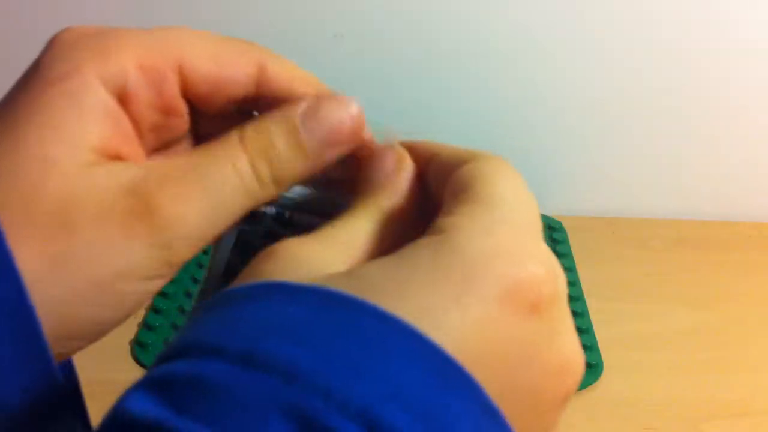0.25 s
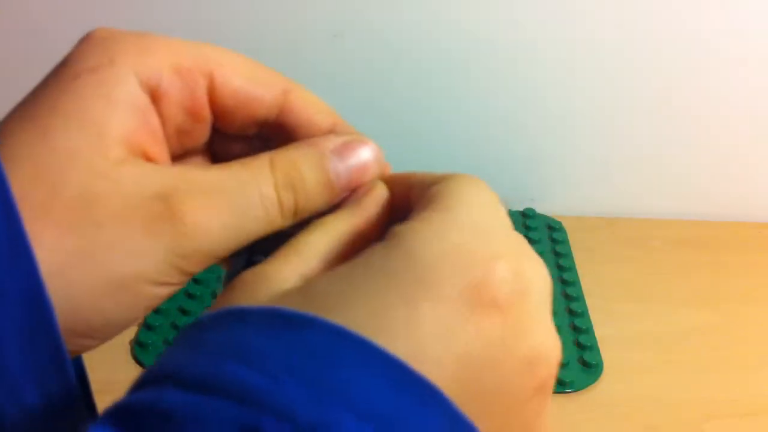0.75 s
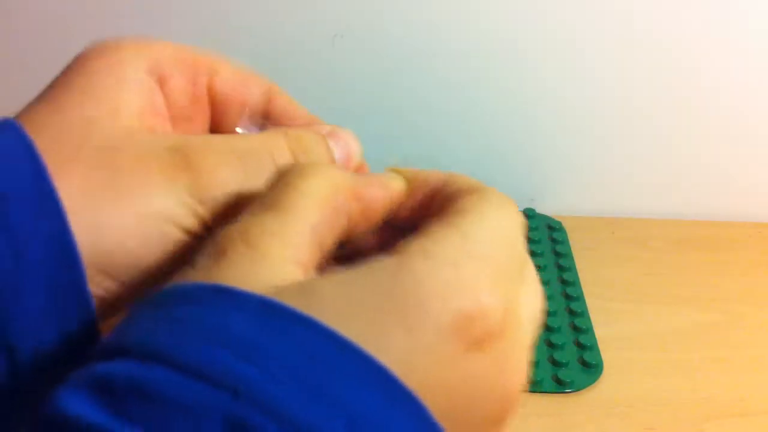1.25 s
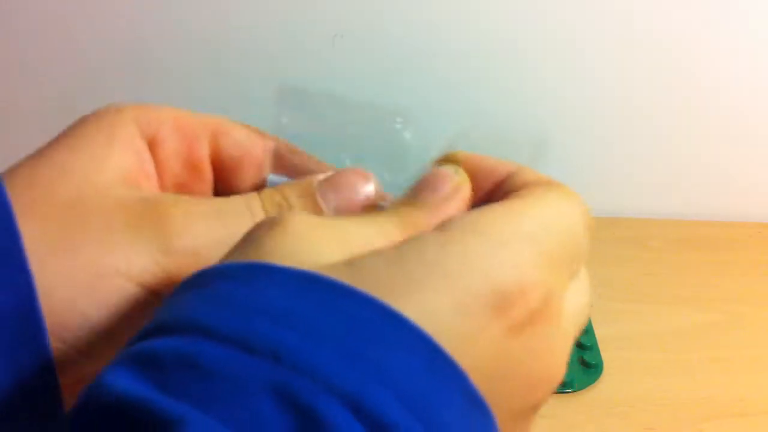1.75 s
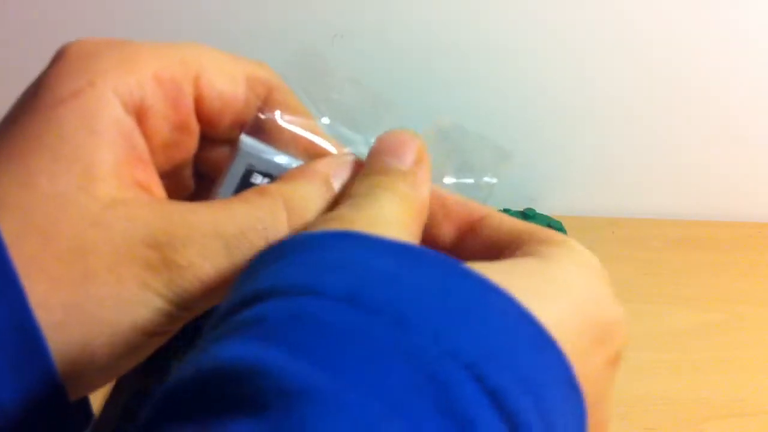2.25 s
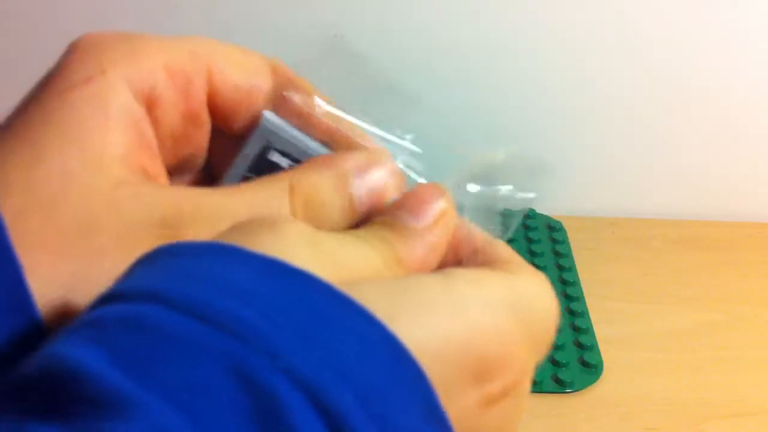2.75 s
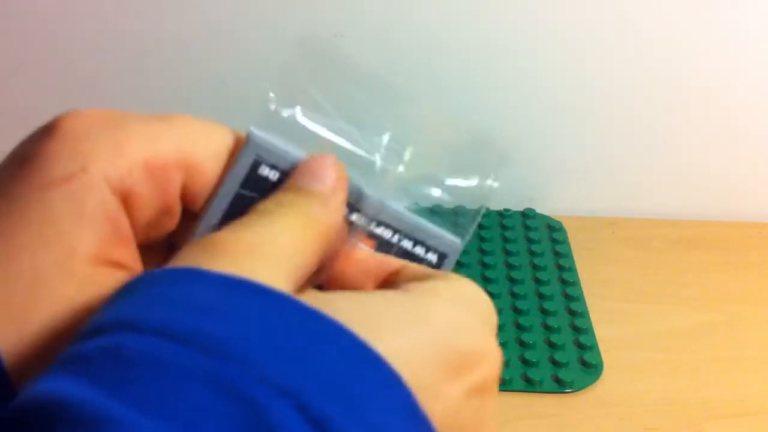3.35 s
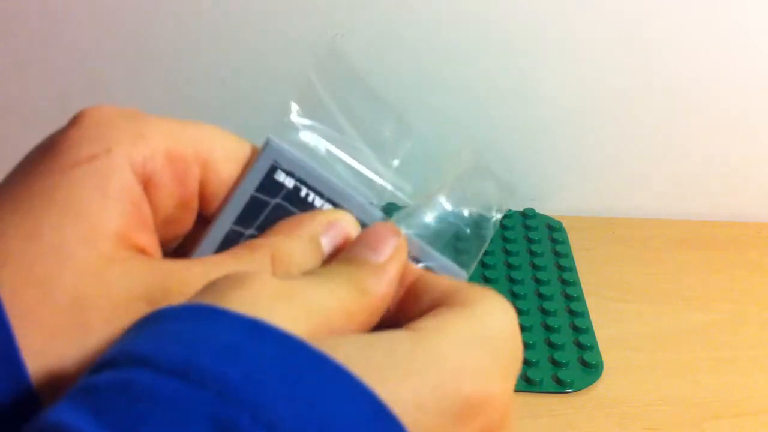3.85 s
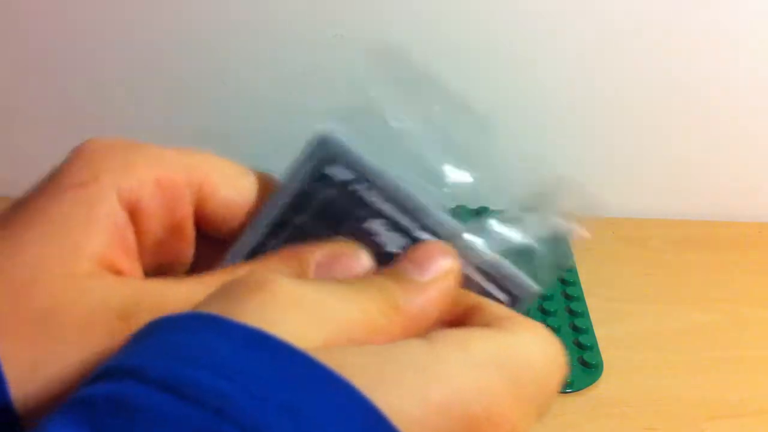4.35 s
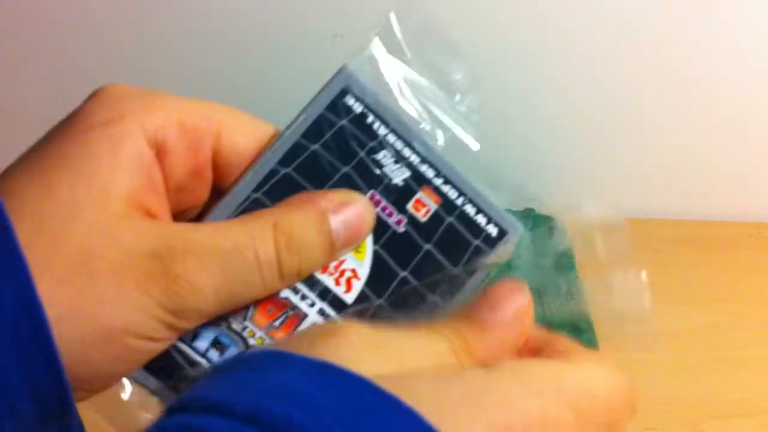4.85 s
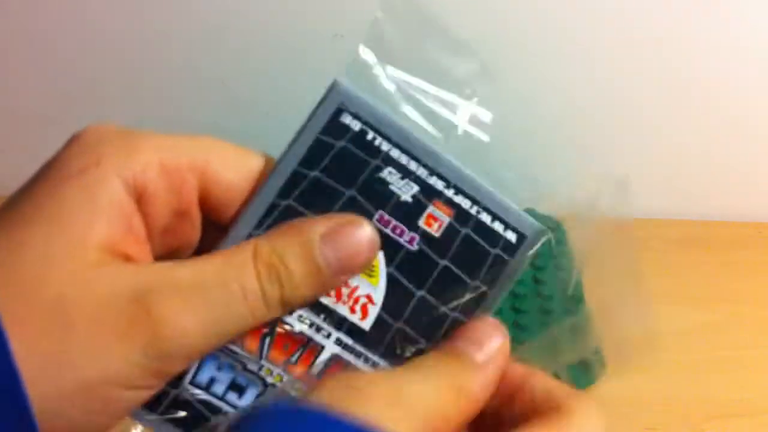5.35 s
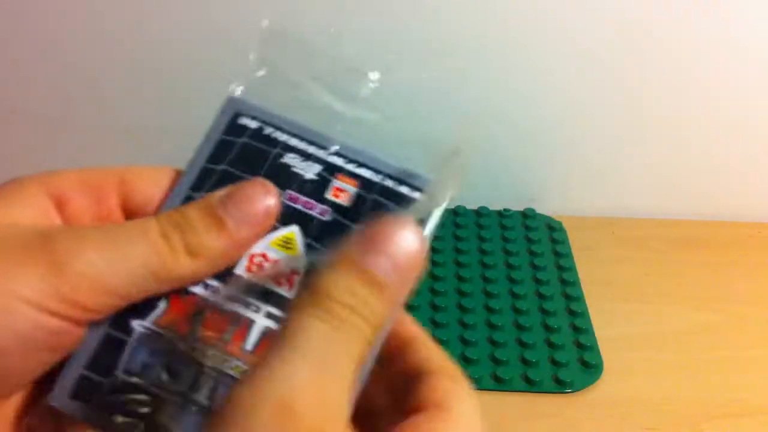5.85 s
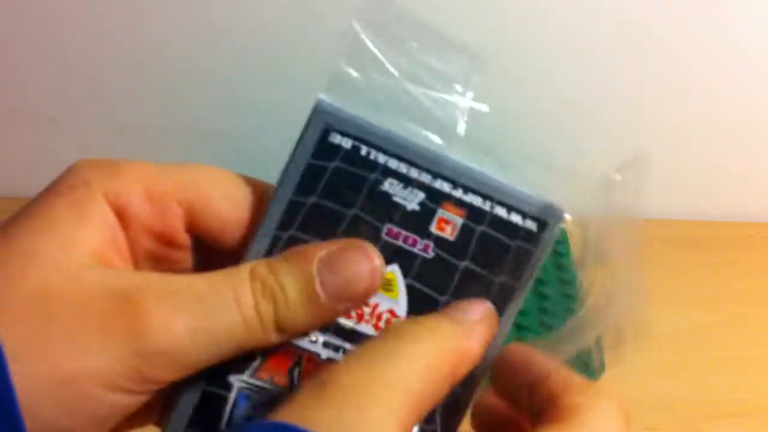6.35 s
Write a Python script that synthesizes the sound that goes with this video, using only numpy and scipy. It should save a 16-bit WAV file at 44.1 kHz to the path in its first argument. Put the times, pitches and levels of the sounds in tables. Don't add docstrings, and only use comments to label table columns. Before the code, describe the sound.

Thin clear plastic wrapper crackles and snaps in irregular bursts as fingers pick, tear and peel it off a card deck, with soft table bumps.

```python
import sys
import numpy as np
from scipy import signal
from scipy.fft import rfft, irfft
from scipy.io import wavfile
from scipy.ndimage import uniform_filter1d, minimum_filter1d

SR = 44100
rng = np.random.default_rng(int(sys.argv[2]) if len(sys.argv) > 2 else 0)


def volts(x):
    e = np.asarray(x, float) / 20
    return 10 ** e


def persist_wave(psi):
    counts = np.round(np.clip(psi, -1, 1) * 32767).astype(np.int16)
    wavfile.write(sys.argv[1], SR, np.atleast_2d(counts).T)


N = 291942

# start_s, peak_db, ring_hz, slack_db
PICKING_SNAPS = [(0.1113, -20.5, 10000, -15.5), (0.152, -24, 6500, -41), (0.178, -23.5, 2110, -30.5),
                 (0.2189, -26, 8350, -31), (0.3242, -26, 7400, -39), (0.3563, -24.5, 5440, -53),
                 (0.3941, -20.5, 8400, -53), (0.5854, -24, 5770, -13), (0.606, -22, 5500, -13),
                 (0.8855, -23, 9550, -31), (0.9348, -27, 2850, -7), (1.225, -31.5, 2970, -25),
                 (1.294, -21.5, 6350, -44), (1.3112, -19, 8800, -14), (1.3308, -23.5, 9100, -25),
                 (1.3347, -24, 5400, -14), (1.3403, -20, 4370, -29), (1.3582, -22, 4200, -35),
                 (1.404, -25.5, 5140, -26), (1.4909, -20.5, 5700, -14), (1.539, -24, 6340, -30),
                 (1.5663, -28, 1850, 4), (1.601, -27.5, 3150, -12), (1.7854, -30.5, 4300, -20),
                 (1.9153, -21.5, 7760, -34), (1.921, -10.5, 4200, -32), (1.9646, -18.5, 4240, -20)]
# start_s, peak_db, ring_hz, slack_db
TEARING_SNAPS = [(2.1349, -28, 2100, -24), (2.2124, -22.5, 7100, -26), (2.2242, -25.5, 9100, -28),
                 (2.242, -27.5, 7900, -34), (2.355, -20, 7350, -73), (2.4514, -24.5, 7800, -46),
                 (2.499, -22.5, 9050, -72), (2.6219, -8.5, 6900, -40), (2.635, -19, 4830, -52),
                 (2.6476, -20, 5900, -33), (2.6543, -15, 6230, -24), (2.67, -14.5, 6900, -34),
                 (2.8738, -24.5, 7940, -55), (2.8811, -18.5, 8250, -29), (2.9538, -23.5, 2680, -18),
                 (3.055, -21, 8100, -64), (3.0923, -23, 7900, -10), (3.102, -20, 7500, -61),
                 (3.325, -20.5, 5400, -35), (3.3463, -22, 6460, -17), (3.3556, -17.5, 6500, -36),
                 (3.495, -29.5, 2760, -23), (3.5488, -25, 7600, -22), (3.6047, -22.5, 5740, -37)]
# start_s, peak_db, ring_hz, slack_db
PUSHING_SNAPS = [(4.0084, -20.5, 4470, -13), (4.0138, -23, 4080, -18), (4.0197, -21.5, 3520, -40),
                 (4.0409, -11.5, 3200, -21.5), (4.0924, -25.5, 3000, -54), (4.1324, -24, 3730, -73),
                 (4.1125, -52, 3300, -54), (4.3061, -28, 5900, -18), (4.3193, -28, 3730, -40),
                 (4.3306, -24, 3380, -22), (4.3537, -22, 11000, -24), (4.362, -27, 8250, -41),
                 (4.3948, -23.5, 4100, -69), (4.397, -17.5, 10600, -61), (4.6938, -22, 2960, -25),
                 (4.701, -21.5, 4940, -25), (4.7158, -20.5, 3550, -65), (4.7659, -11, 3860, -36),
                 (4.7841, -16.5, 1760, -23), (4.7949, -19, 7290, -28), (4.8187, -15, 4000, -8),
                 (4.835, -16, 7040, -16), (4.852, -16, 7000, -17), (4.8558, -10, 6100, -27),
                 (4.8898, -18.5, 1790, -23), (4.9008, -21, 7840, -33), (4.9096, -23.5, 1670, -3)]
# start_s, peak_db, ring_hz, slack_db
PEELING_SNAPS = [(5, -22, 3470, -29), (5.007, -25.5, 3300, -22), (5.023, -22, 1560, -28),
                 (5.0317, -19, 8800, -24), (5.044, -19.5, 2030, -28), (5.057, -23, 4730, -14),
                 (5.067, -26, 6000, -32), (5.106, -19.5, 9100, -45), (5.1151, -19, 6040, -64),
                 (5.245, -19, 12400, -26.5), (5.4284, -17.5, 3850, -39), (5.441, -16, 7800, -18),
                 (5.47, -14, 4910, -17), (5.4823, -4.5, 4600, -16.5), (5.5048, -15, 1840, -20),
                 (5.5262, -20.5, 6450, -20), (5.5374, -15.5, 11300, -28), (5.547, -17.5, 1860, -23),
                 (5.6077, -25, 9600, -26), (5.612, -22, 7900, -18), (5.724, -25.5, 1900, -13),
                 (5.93, -28, 2900, -47), (6.282, -22, 3240, -62), (6.315, -19.5, 4000, -64),
                 (6.3995, -11.5, 2670, -21), (6.568, -14.5, 5700, -26)]

# start_s, peak_db, ring_hz
SMALL_TICKS = [(0.0313, -37, 8300), (0.0965, -37.5, 2250), (0.1299, -29, 5300), (0.3001, -27, 5950),
               (0.492, -34.5, 2300), (0.506, -37, 6000), (0.7355, -43.5, 1680), (1.02, -34, 6850),
               (1.1454, -35, 6500), (1.175, -35, 5330), (1.48, -31, 5440), (1.612, -32, 7600),
               (1.647, -27.5, 7440), (1.659, -30.5, 6950), (1.6836, -27.5, 5800), (1.694, -31, 5700),
               (1.867, -32.5, 6230), (0.373, -42, 4000), (0.5149, -39.5, 4400), (1.1186, -46, 4000),
               (1.5283, -40, 5000), (2.3246, -38.5, 6000), (2.106, -35, 2410), (2.187, -34, 6600),
               (2.4004, -26.5, 4050), (2.577, -34.5, 6360), (2.7833, -30, 8060),
               (2.7984, -28, 6500), (2.805, -30.5, 8850), (2.8317, -44, 5030), (2.836, -28.5, 4360),
                (3.5158, -36, 4000), (4.4401, -39, 5800), (4.6767, -39, 3500), (2.843, -28.5, 5800),
                (2.9253, -32.5, 4200), (3.039, -35.5, 4520), (3.125, -36, 5800), (3.2244, -36, 3840),
                (3.263, -31.5, 4500), (3.37, -34, 6500), (3.4193, -28.5, 4430), (3.8978, -33.5, 4460),
                (3.9527, -39, 2590), (4.0348, -25, 4000), (4.21, -33, 8750), (4.273, -33, 6200),
                (4.375, -24, 3880), (4.459, -37, 5160), (4.5132, -29, 5360), (4.5448, -28.5, 5100),
                (4.595, -32.5, 5100), (4.659, -34, 3900),
               (5.1023, -32, 4000), (5.3355, -35, 5740), (5.3537, -33, 5530), (5.389, -32, 9100),
              (5.4, -26.5, 6000), (5.412, -27.5, 2940), (5.4907, -23, 2970), (5.586, -32, 3130),
              (5.621, -28, 3160), (5.6864, -33, 3560), (5.7385, -34.5, 1980), (5.4827, -11.5, 2130),
              (5.844, -33, 8650), (6.023, -36, 8400), (6.036, -29.5, 6200), (6.2326, -53, 2770),
              (6.5408, -32, 2690), (6.158, -29.5, 5060), (6.178, -37, 9000), (6.1909, -31.5, 5370),
              (6.2618, -31.5, 6000), (6.3064, -26, 4160), (6.53, -32, 2940)]
# start_s, peak_db, ring_hz
FAINT_TICKS = [(0.108, -35, 6800), (0.1698, -46, 9100), (0.19, -34, 4400), (0.2686, -42.5, 2180),
               (0.317, -32.5, 7000), (2.0315, -43, 4000), (0.942, -36, 7000), (0.975, -41, 4150),
               (0.985, -42, 4340), (1.4543, -36, 4000), (1.5121, -39, 9000), (1.5172, -47, 4300),
               (1.574, -33, 7800), (1.71, -38, 6500), (1.724, -44, 5870), (1.778, -31.5, 9200),
               (1.8263, -42, 3880), (1.8526, -42, 4100), (1.9353, -30, 4400), (1.9536, -31, 6200),
               (1.986, -29, 4600), (1.9947, -32, 4700), (2.047, -30.5, 3550), (2.067, -39, 8000),
               (2.1783, -38, 8800), (2.2, -24, 5700),
               (2.332, -41, 7300), (2.4242, -32, 6700), (2.466, -40, 4100), (2.5123, -43, 9000),
                      (2.6114, -33.5, 5550), (2.631, -30, 5460), (2.7786, -39, 2390), (2.87, -34, 4800),
                      (2.949, -39.5, 6800), (3.062, -27, 4850), (3.1706, -41, 3600), (3.302, -33, 2400),
                      (3.3879, -35, 5140), (3.4104, -28, 5850), (3.608, -31.5, 1970), (3.544, -37.5, 4270),
                      (3.5947, -29, 7950), (3.6022, -28, 4000), (3.831, -43, 5560), (3.922, -47, 5300),
                      (3.9285, -39, 1910), (3.97, -34.5, 4630), (3.994, -45, 6500), (4.056, -35, 3500),
                      (4.141, -44, 3400), (4.1885, -45, 3720), (4.1957, -45, 12600), (4.4028, -29, 5160),
                      (4.464, -40, 2000),
               (4.508, -40, 3300), (4.6067, -39, 4000), (4.631, -45, 3800), (4.642, -45, 1890),
                    (4.708, -29, 6200), (4.726, -37, 4800), (4.7352, -41, 4500), (4.801, -27, 2000),
                    (4.8737, -29, 5400), (4.887, -24, 4500), (4.954, -36.5, 2090), (4.977, -36.5, 2000),
                    (5.0176, -31, 2000), (5.0379, -29, 4700), (5.0636, -27, 5060), (5.121, -24, 7340),
                    (5.176, -46, 6300), (5.186, -40, 6300), (5.195, -43, 4600), (5.223, -37, 12200),
                    (5.296, -39.5, 6030), (5.326, -46, 2770), (5.3863, -36, 7800), (5.4353, -26, 4000),
                    (5.4537, -25, 2170), (5.4755, -30, 1730), (5.8298, -47, 12200), (5.927, -39, 2900),
                    (5.947, -42, 2800), (6.0439, -45, 7900), (6.0667, -43, 7500), (6.1135, -38, 7250),
                    (6.252, -41, 3280), (6.2737, -32, 4000), (6.321, -33, 7900), (6.3316, -26, 2300),
                    (6.345, -39, 3600), (6.3566, -33, 4800), (6.4157, -28, 8100), (6.5523, -37, 1790),
                    (6.5762, -25, 12500)]
# start_s, peak_db, ring_hz
PACKED_TICKS = [(0.2296, -34.5, 3900), (.3293, -31, 9200), (1.3053, -25.5, 9000), (1.3207, -30, 7100),
                (1.325, -26.5, 1620), (1.3504, -47, 5300), (1.39, -39, 5800), (1.498, -37, 6000),
                (1.5698, -31, 5800), (1.6498, -30.5, 5400), (1.925, -36, 3800), (1.9305, -26, 8000),
                (1.9771, -34, 4300), (2, -33, 9100), (2.004, -30, 7650), (2.209, -28, 8800),
                (2.244, -28, 8100), (2.6235, -17, 7200), (2.6314, -30, 7700), (2.643, -35, 7700),
                (2.6516, -16, 6100), (3.0828, -33, 8200), (3.335, -36, 5000), (3.3401, -39, 5700),
                (4.018, -23, 5200), (4.0233, -35, 3400), (4.3355, -33, 1800), (4.368, -36, 2200),
                (4.776, -30.5, 3000), (4.806, -26, 8100), (4.8112, -30, 3500), (4.815, -19, 3900),
                (4.8304, -27, 3100), (4.838, -22, 2360), (4.843, -40, 2700), (4.8613, -19, 2080),
                (4.8634, -21, 1800), (4.8683, -19.5, 9500), (4.924, -35, 2500), (5.0501, -37, 5850),
                (5.053, -35, 2000), (5.072, -23, 12500), (5.4235, -36, 5900), (5.462, -30, 1600),
                (5.494, -29, 2480), (5.497, -33, 4700), (5.534, -27, 1900), (6.018, -40, 8000),
                (6.03, -38, 9200), (6.385, -22, 4200), (6.387, -26, 4000)]

# peak_s, level_db, rise_s, fall_s
TUGS = [(.17, -45.5, 0.12, 0.13), (.41, -57.5, 1, 1), (.92, -69, 0.045, 1), (1.332, -34, 0.045, 0.06),
        (1.6, -51, 0.47, 0.11), (1.949, -48, 0.73, 0.33), (2.219, -36.5, 0.057, 0.041),
        (2.641, -35.5, 0.031, 0.069), (2.89, -52, 0.29, 0.17), (3.08, -51.5, 0.13, 0.093),
        (3.339, -40, 0.13, 0.076), (3.61, -54, 0.61, 0.082), (4.029, -38.5, 0.042, 0.089),
        (4.349, -41.5, 0.043, 0.026), (4.67, -58.5, 1, 0.15), (4.85, -31, 0.08, 0.1),
        (5.053, -37.5, 0.076, 0.095), (5.469, -40, 0.16, 0.16), (5.8, -52, 1, 0.19),
        (6.03, -49.5, 0.13, 0.2), (6.38, -55, 0.31, 0.15), (6.6, -51.5, 1, .3)]
# time_s, ring_hz
AIR_POCKET = [
    (0, 4000),
    (2.75, 5300),
    (3.85, 4180),
]
# time_s, level_db
EDGE_SLIDE = [
    (6.325, -77.5),
    (6.365, -41.5),
    (6.39, -37.5),
    (6.402, -25.5),
    (6.408, -43),
    (6.45, -85),
]
# time_s, level_db
FINGER_BRUSH = [
    (1.9, -78),
    (2.02, -53),
    (2.14, -80),
]

# start_s, peak_db, brightness_hz, drag_s
BUMPS = [(5.41, -56, 700, 0.058), (5.56, -49, 704, .05), (6.029, -50, 358, 0.031), (6.31, -52.5, 590, 0.06),
         (0.43, -40.5, 1110, 0.05), (0.272, -47, 385, 0.08), (0.329, -46.5, 310, 0.023),
         (0.408, -45.5, 410, 0.096), (0.469, -44.5, 246, 0.028), (0.975, -46.5, 188, 0.038),
         (1.223, -27, 402, 0.045), (1.487, -47.5, 653, 0.039), (1.829, -39.5, 343, 0.044),
         (1.958, -45.5, 463, 0.075), (2.09, -30, 430, 0.017), (2.13, -35.5, 300, 0.051),
         (2.219, -34.5, 298, 0.0071), (2.473, -43, 570, 0.042), (2.595, -44.5, 171, 0.059),
         (3.602, -51, 220, 0.053), (4.349, -46, 549, 0.0083), (5.851, -44.5, 610, 0.016),
         (5.931, -50, 457, 0.07)]
# start_s, peak_db, brightness_hz, drag_s
JOLTS = [
    (4.034, -24.5, 764, 0.0038),
    (4.79, -38.5, 356, 0.057),
    (4.854, -23.5, 835, 0.0078),
    (5.017, -40.5, 650, 0.045),
    (5.479, -20, 700, 0.0056),
    (6.394, -28.5, 354, 0.0074),
    (6.553, -33, 800, 0.0083),
]
# ring_hz, level_db, decay_60db_s
TABLE_MODES = [(188, -1.5, 0.1), (230.4, -8.5, 0.16), (333, 4, 0.046), (369.5, -5, 0.23), (415, 1.5, 0.059),
               (476.5, -0.5, 0.088), (549, -1.5, 0.084), (637, 3, 0.09), (732, 11, 0.015),
               (888, 0.5, 0.044), (1400, -3, 0.06)]
# centre_hz, decay_60db_s, level_db
ROOM_BANDS = [
    (310, 0.59, -16),
    (1260, 0.019, 0),
    (4000, 0.26, -12),
    (11000, 0.2, -11.5),
]
# pitch_hz, density_db
HISS_COLOUR = [
    (22, 3.5),
    (70, -16),
    (180, -2),
    (450, -1.5),
    (1200, -7.5),
    (4000, -11),
    (11000, -16),
    (16000, -10),
]


def wrapper():
    ticks = SMALL_TICKS
    ticks = ticks + FAINT_TICKS + PACKED_TICKS
    ticks = [tuple(row) + (-27,) for row in ticks]
    snaps = PICKING_SNAPS + TEARING_SNAPS + PUSHING_SNAPS + PEELING_SNAPS
    start_s, peak_db, ring_hz, slack_db = np.transpose(snaps + ticks)
    peak_lag_s = 0.0017
    after_db = -23.5 - 0.22 * (peak_db[:, None] + 23.5)
    big = creases(start_s + peak_lag_s, peak_db - 0.5, ring_hz, slack_db + 10.5,
                  after_db=after_db, after_s=0.0023, neighbour_db=-1.5)

    tiny_per_s, clump_s = 900, 0.007
    draw = rng.random((int(tiny_per_s * N / SR), 4))
    tiny_s = draw[:, 0] * (N - 1) / SR
    clump = draw[(tiny_s / clump_s).astype(int)] - 0.5
    tiny_db = pull(tiny_s) - 3.5 - 3.4 * np.log(1 - 0.96 * draw[:, 1])
    tiny_db = tiny_db + 9.0 * clump[:, 1]
    pocket_hz = np.interp(tiny_s, *np.transpose(AIR_POCKET))
    tiny_hz = pocket_hz * volts(12.5 * (draw[:, 2] - 0.5) + 6.7 * clump[:, 2])
    tiny_slack_db = -9 + 12 * (draw[:, 3] - 0.5)
    swarm = creases(tiny_s, tiny_db, tiny_hz, tiny_slack_db,
                    after_db=-9.0, after_s=0.003, neighbour_db=-2.5, size=256)
    return big + swarm


def creases(s, db, hz, low_db, after_db, after_s, neighbour_db, size=1024):
    lead = 44
    before_s = 0.0006
    t = (np.arange(size) - lead) / SR
    shake = rng.standard_normal((len(s), size))
    sparse = rng.standard_normal((len(s), size))
    lean = rng.standard_normal((len(s), 4))
    kick = (t == 0) * np.sign(lean[:, 3:])
    spread = np.exp(-np.abs(t) / np.where(t < 0, before_s, after_s))
    rattle_db = after_db + 1.9 * np.clip(lean[:, 2:3], -2, 0.4)
    rattle = volts(rattle_db) * spread * shake * volts(7.22 * np.clip(sparse, -2, 2))

    f = np.arange(size // 2 + 1) * SR / size
    panel_hz, slack_db = hz[:, None], low_db[:, None]
    octaves = np.log2(panel_hz / 4600.0)
    panel = resonance(f, panel_hz, 0.59 * volts(1.1 * octaves)) ** 2
    bare_snap = volts(-6.5 + 5.7 * octaves + 0.17 * slack_db) * resonance(f, 5250.0, 2.17)
    neighbour_hz = 4730.0 * volts(3.7 * lean[:, :1])
    neighbour = volts(neighbour_db + 2.6 * octaves) * resonance(f, neighbour_hz, 0.43) ** 2
    slack = volts(slack_db + 5.0) * resonance(f, 1350.0, 4.43) ** 2
    sizzle = volts(-18 + 0.13 * slack_db + 2.0 * lean[:, 1:2]) * resonance(f, 7500.0, 0.66)
    colour = panel + bare_snap - neighbour + slack + sizzle

    shapes = irfft(rfft(kick + rattle) * colour) * np.exp(-(t / t[-1] * 2) ** 4)
    shapes = shapes * volts(db[:, None]) / np.abs(shapes).max(axis=1, keepdims=True)
    return lay(np.clip(s + (6 - lead) / SR, 0, None), shapes)


def pull(s):
    peak_s, db, rise_s, fall_s = np.transpose(TUGS)[:, :, None]
    rising = (peak_s - s) / np.maximum(rise_s, 0.01)
    falling = (s - peak_s) / np.maximum(fall_s, 0.01)
    away = np.where(s < peak_s, rising, falling)
    return 10 * np.log10((volts(db - 20 * away) ** 2).sum(axis=0))


def slide():
    f = np.arange(N // 2 + 1) * SR / N
    unevenness_db = 2.6 * rng.standard_normal(N // 64 + 1).repeat(64)[:N]
    grit = rng.standard_normal(N) * volts(unevenness_db)
    taut_sheet = resonance(f, 3930.0, 0.69) + volts(-7.0) * resonance(f, 7800.0, 0.24)
    edge = irfft(rfft(grit) * taut_sheet, N)
    rub = irfft(rfft(grit) * resonance(f, 1540.0, 1.0) ** 2, N)
    edge = edge / edge.std() * volts(curve(EDGE_SLIDE))
    return edge + rub / rub.std() * volts(curve(FINGER_BRUSH))


def table():
    s, db, bright_hz, drag_s = np.transpose(BUMPS + JOLTS)[:, :, None]
    t = np.arange(8192) / SR
    force = (1 - np.exp(-t / 0.00012)) * np.exp(-t / np.clip(drag_s, 0.003, 0.06))
    f = np.arange(len(t) // 2 + 1) * SR / len(t)
    rough = irfft(rfft(rng.standard_normal(force.shape)) * resonance(f, 0.96 * bright_hz, 0.65))
    rough_power = ((force * rough) ** 2).sum(axis=1, keepdims=True)
    rough = rough / np.sqrt(rough_power / (force ** 2).sum(axis=1, keepdims=True))
    push = lay(np.clip(s[:, 0] - 0.003, 0, None), force * rough * volts(db - 53.0))

    time = np.arange(SR // 2) / SR
    ring = np.zeros(len(time))
    sign = -1
    for hz, mode_db, t60 in TABLE_MODES:
        ring += sign * volts(mode_db) * np.sin(2 * np.pi * hz * time) * 1000.0 ** (-time / t60)
        sign = -sign

    scuff = irfft(rfft(rng.standard_normal(force.shape)) * resonance(f, 1280.0, 2.8))
    scuffs = lay(s[:, 0], np.sqrt(force) * scuff * volts(db - 21.0))
    return signal.fftconvolve(push, ring)[:N] + scuffs


def room(x):
    t = np.arange(SR // 2) / SR
    f = np.arange(len(t) // 2 + 1) * SR / len(t)
    tail = np.zeros(len(t))
    for hz, t60, db in ROOM_BANDS:
        band = irfft(rfft(rng.standard_normal(len(t))) * resonance(f, hz, 1.0), len(t))
        tail += volts(db) * band * 1000.0 ** (-t / t60) / np.sqrt(t60 * SR / 14)
    tail = tail * np.clip(t / 0.0042, 0, 1)
    return x + signal.fftconvolve(x, tail)[:N]


def hiss():
    hz, db = np.transpose(HISS_COLOUR)
    f = np.arange(N // 2 + 1) * SR / N
    shape_db = np.interp(np.log(f + 1), np.log(hz), db)
    x = irfft(rfft(rng.standard_normal(N)) * volts(shape_db), N)
    return x * volts(-65.5) / x.std()


def resonance(f, hz, share):
    w = 1j * f / hz
    return share * w / (1 + share * w + w * w)


def curve(points):
    s, level = np.transpose(points)
    return np.interp(np.arange(N) / SR, s, level)


def lay(s, shapes):
    at = (np.asarray(s) * SR).astype(int)[:, None] + np.arange(shapes.shape[1])
    return np.bincount(at.ravel(), shapes.ravel(), N + shapes.shape[1] + SR)[:N]


def scene():
    return (room(wrapper() + slide() + table()) + hiss())[None]


def starve(x, under_db, size=256):
    f, _, z = signal.stft(x, SR, nperseg=size)
    power = uniform_filter1d(np.abs(z) ** 2, size=7, axis=0)
    power = uniform_filter1d(power, size=2, axis=1)
    band_db = 10 * np.log10(power + 1e-18)
    treble_db = band_db[(f > 1500) & (f < 15000)].max(axis=0)

    block = (np.arange(len(treble_db)) + 1) // 8
    block_starts = np.flatnonzero(np.diff(block, prepend=-1))
    block_db = np.maximum.reduceat(treble_db, block_starts)[block]
    patches = rng.standard_normal((len(f) // 6 + 1, z.shape[1] // 3 + 1))
    patchy_db = 4.4 * patches.repeat(6, axis=0).repeat(3, axis=1)[:len(f), :z.shape[1]]
    bar_db = block_db - under_db + 2.5 * np.log2(f[:, None] / 3700.0 + 0.35) + patchy_db
    keep = (band_db > bar_db) | (f[:, None] < 1500)

    sudden = treble_db - minimum_filter1d(treble_db, size=3) > 14
    steady_top_hz = 15800
    keep = keep & ((f[:, None] < steady_top_hz) | sudden)
    return signal.istft(z * keep, SR, nperseg=size)[1][:N]


def low_pass(x):
    return signal.sosfilt(signal.butter(12, 16990, fs=SR, output="sos"), x)


def record(dry):
    bass = signal.sosfilt(signal.butter(2, 110, fs=SR, output="sos"), dry)
    x = starve((dry - 1.52 * bass)[0], under_db=28)
    top_cut = signal.ellip(8, 0.2, 70, 16600, fs=SR, output="sos")
    mix = signal.sosfilt(top_cut, x)[None]
    return low_pass(mix)


dry = scene()
out = record(dry)
persist_wave(out)
```